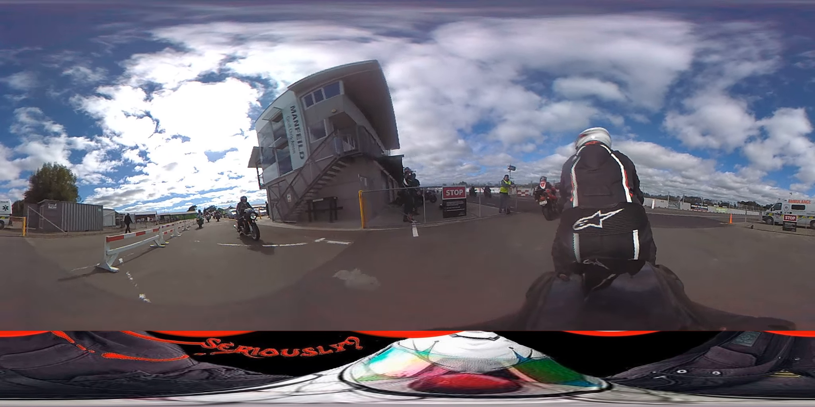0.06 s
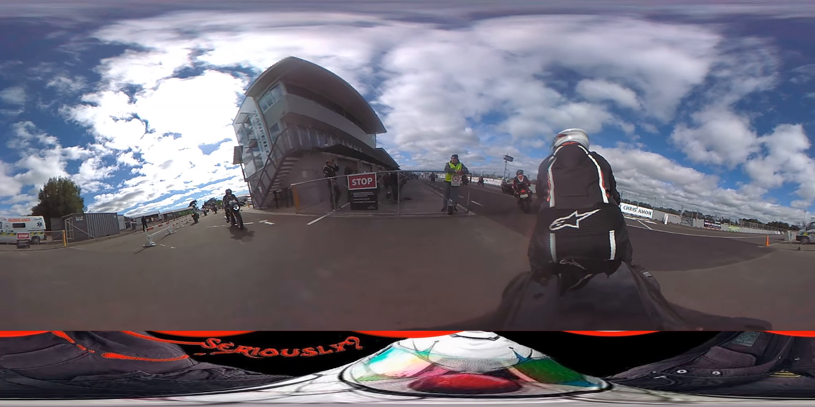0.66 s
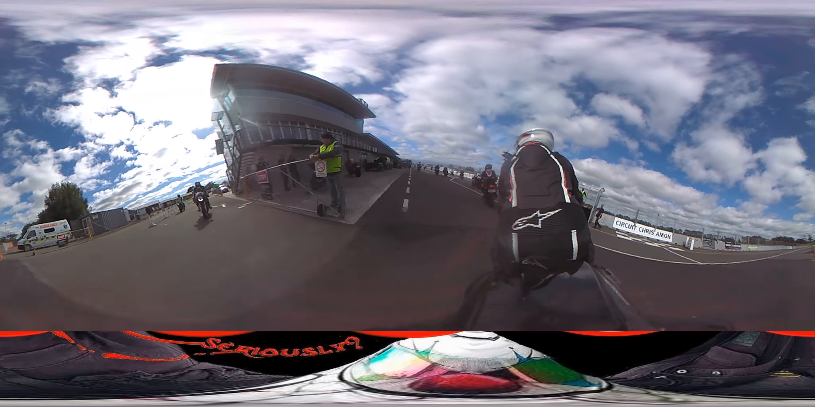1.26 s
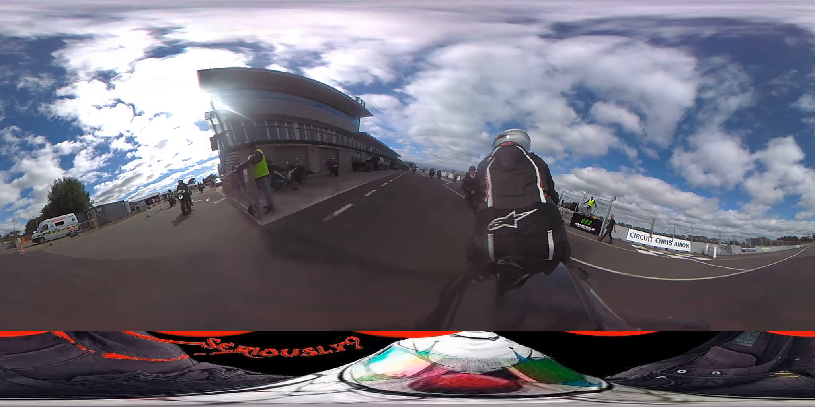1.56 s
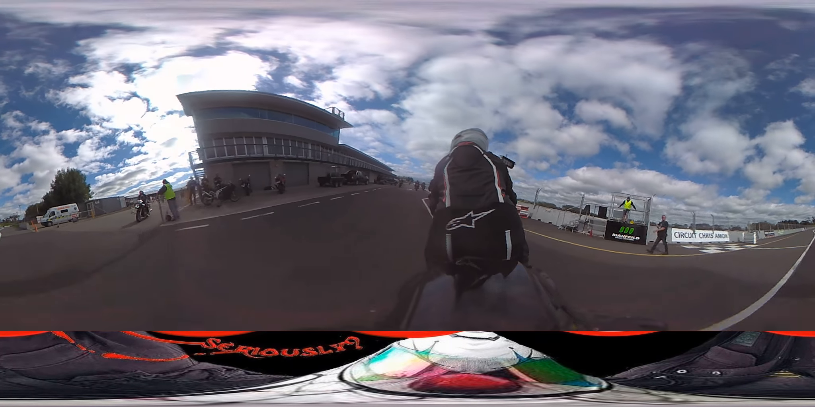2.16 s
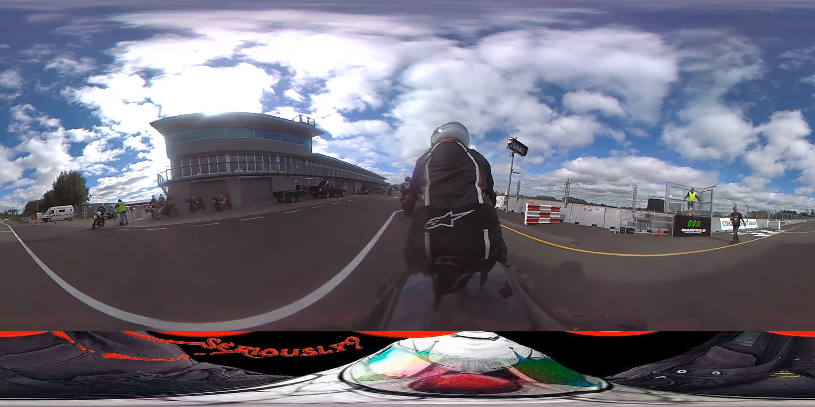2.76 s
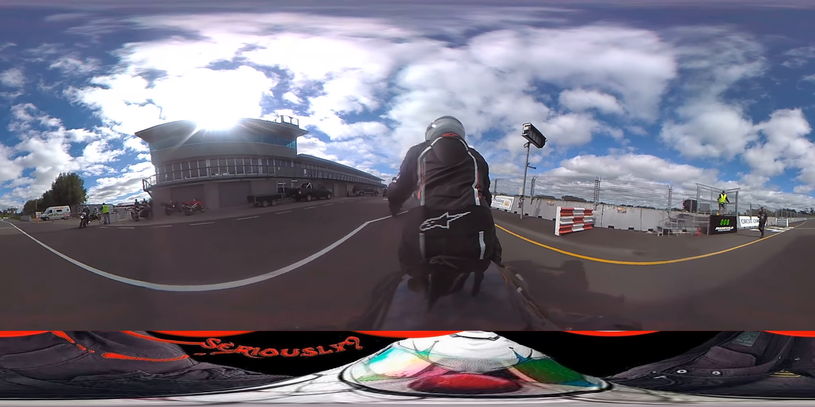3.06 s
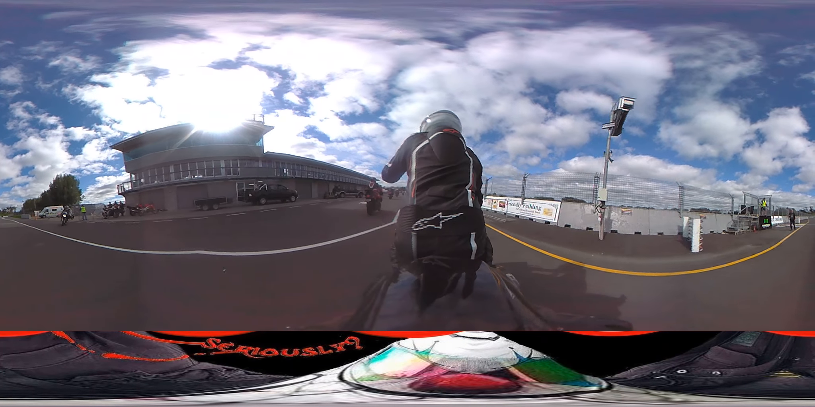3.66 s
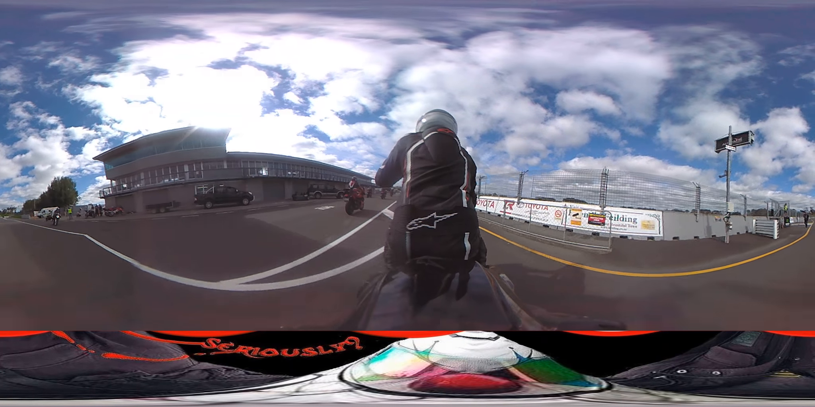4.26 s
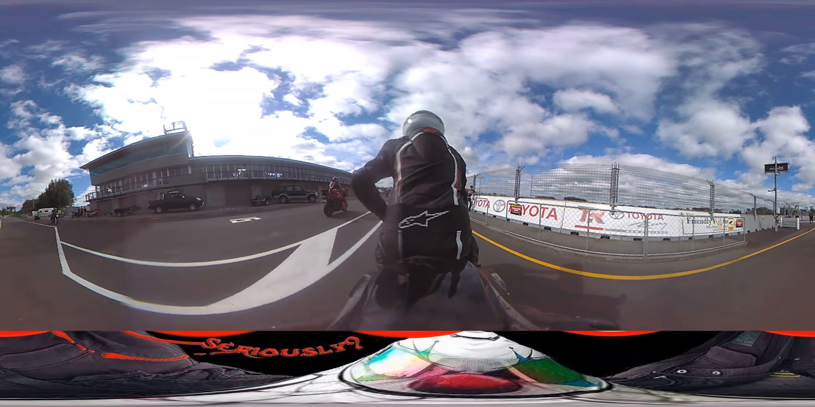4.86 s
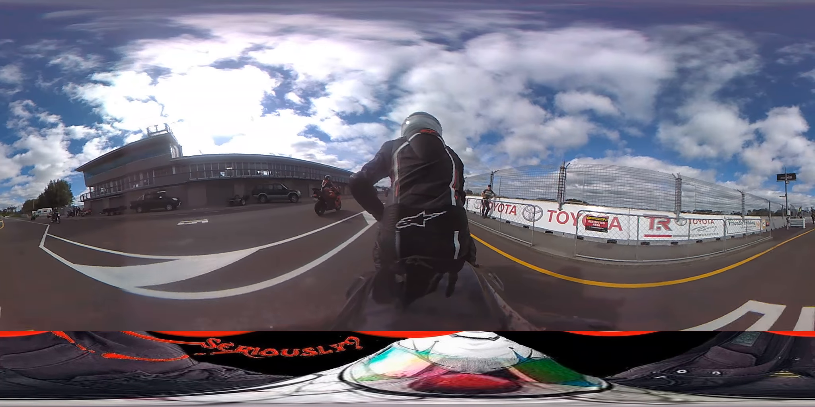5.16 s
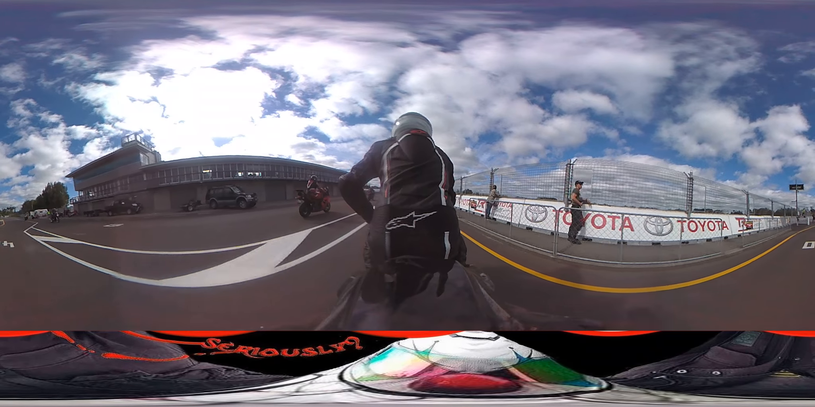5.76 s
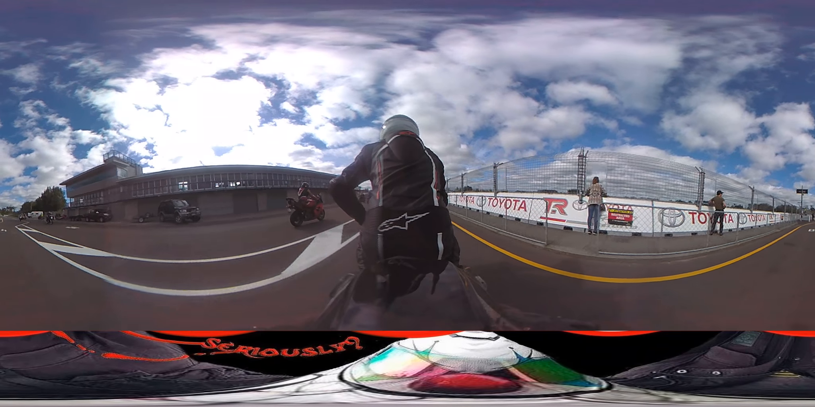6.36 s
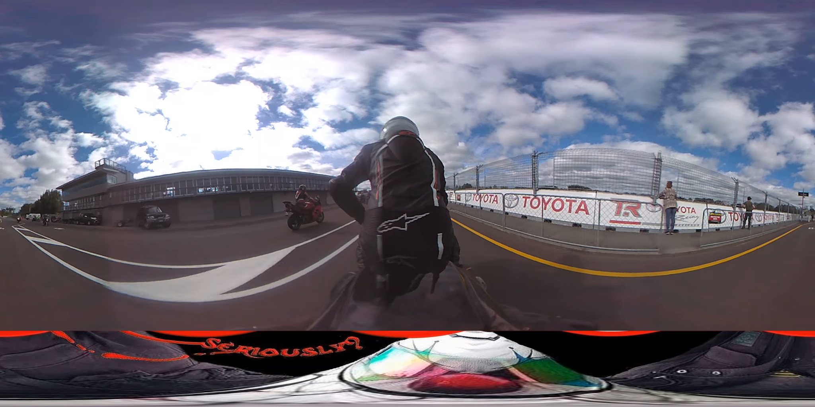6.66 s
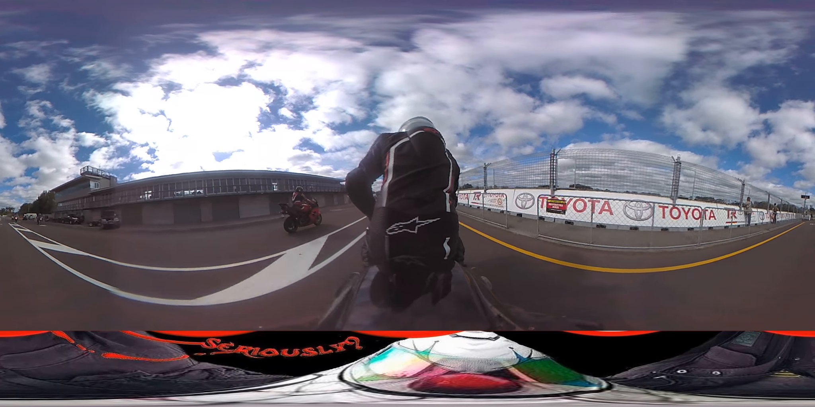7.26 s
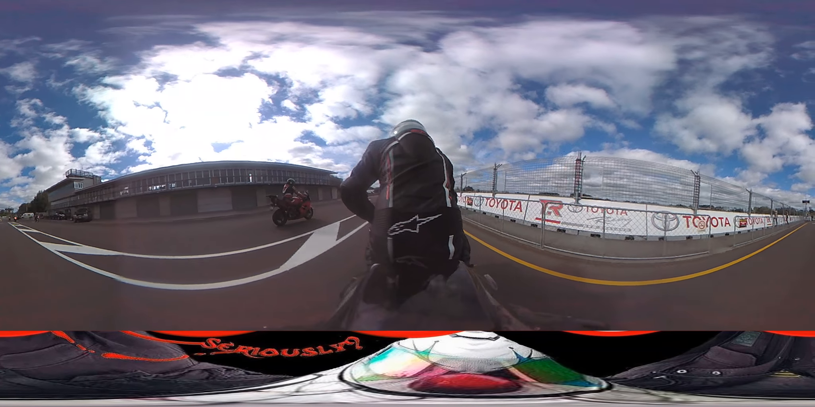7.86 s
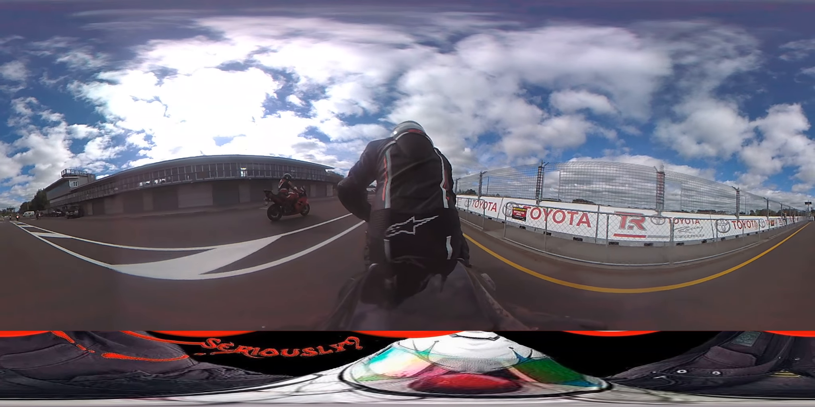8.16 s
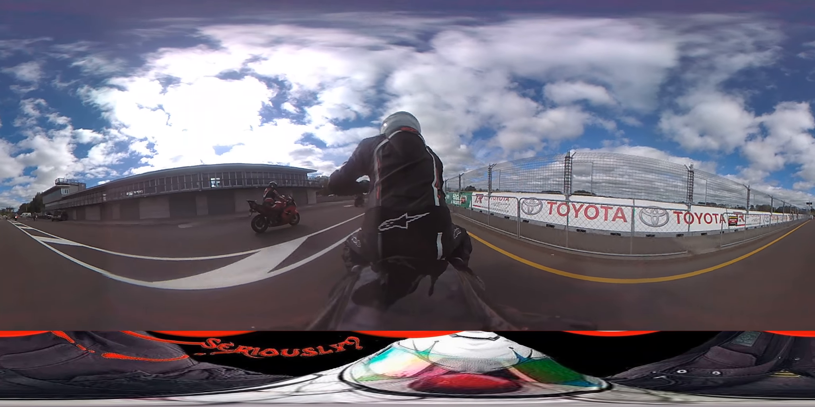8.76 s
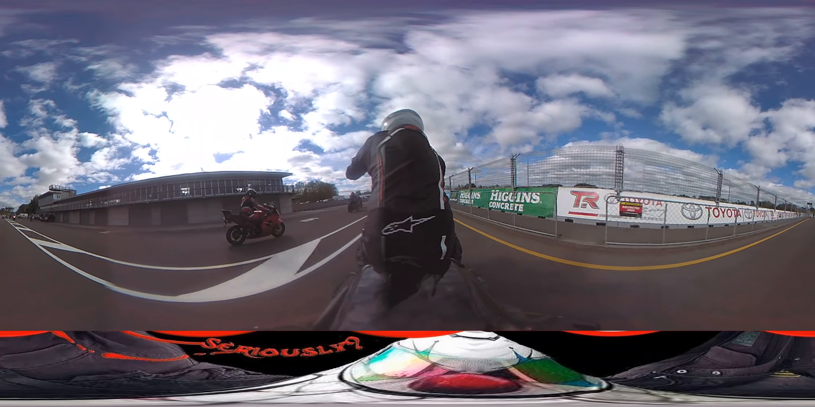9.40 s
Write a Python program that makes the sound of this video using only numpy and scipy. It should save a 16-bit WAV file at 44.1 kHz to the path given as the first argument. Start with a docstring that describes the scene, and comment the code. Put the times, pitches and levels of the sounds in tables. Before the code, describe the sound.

A motorcycle rolls at low revs with a distorted, rasping chatter, pops as the throttle eases, then pulls away in light wind.

```python
"""On a track, a 90-degree V-twin sport motorcycle rolls at low revs, then pulls away, heard from a
camera on its tail. Two unevenly spaced firings a cycle sound the exhaust pipe, which pops and gargles
as the throttle eases midway. Exhaust pressure and slipstream overload both microphones, which flip from
rail to rail; the camera's bass cut turns every flip into a sharp spike, so the engine becomes a hard,
rasping chatter. Wind, a thin fizz and overtones singing in the tail sit behind it."""
import sys
import numpy as np
from scipy import signal
from scipy.fft import rfft, irfft, next_fast_len
from scipy.io import wavfile
from scipy.ndimage import map_coordinates

SR = 44100
rng = np.random.default_rng(int(sys.argv[2]) if len(sys.argv) > 2 else 0)


def to_wav(sig):
    """Store sig (one row per channel, or 1-D mono) as 16-bit WAV at the path in sys.argv[1].

    Samples outside -1..1 are clipped; the rate is SR.
    """
    pcm = np.clip(np.atleast_2d(sig), -1, 1) * 32767
    pcm = np.round(pcm).astype(np.int16)
    wavfile.write(sys.argv[1], SR, pcm.T)  # frames by channels


N = 415849
TIME = np.arange(N) / SR
STEP = 10  # low-pitched layers are built on every tenth sample, then upsampled
COARSE_TIME = np.arange(N // STEP + 1) * STEP / SR


def amp(db):
    """Decibels to gain."""
    return 10 ** (np.asarray(db) / 20)


def curves(rows, t):
    """Automation lanes: each column after the time, read at times t."""
    times, *columns = np.transpose(rows)
    return [np.interp(t, times, column) for column in columns]


def wobble(knots_per_s, t):
    """A smooth random curve, roughly one unit either way."""
    return map_coordinates(rng.standard_normal(int(t[-1] * knots_per_s) + 4), [t * knots_per_s])


def filtered(x, response):
    """x through a filter given as complex gain against frequency."""
    size = next_fast_len(N + SR // 4)
    return irfft(rfft(x, size) * response(np.fft.rfftfreq(size, 1 / SR)), size)[..., :N]


def highs(x, above_hz):
    """The part of x above a soft crossover."""
    return filtered(x, lambda hz: hz ** 4 / (hz ** 4 + above_hz ** 4))


def noise(spectrum, spread):
    """Coloured stereo noise of rms 1; spread is the ratio of side to mid."""
    freq_hz, level_db = np.transpose(spectrum)
    eq = lambda hz: amp(np.interp(np.log(hz + 1), np.log(freq_hz), level_db))
    mid, side = filtered(rng.standard_normal((2, N)), eq)
    pair = np.array([mid + spread * side, mid - spread * side])
    return pair / pair.std()


def bell(offset, half_width):
    """A bell curve: 1 at its centre, 1/e at half_width either side."""
    return np.exp(-(offset / half_width) ** 2)


def resonance(hz, centre_hz, width_hz):
    """Gain of a resonance at pitch hz, 1 at its centre."""
    return 1 / (1 + (2 * (hz - centre_hz) / width_hz) ** 2)


def cycles_from(cycles, place):
    """Signed distance, in cycles, from the nearest pass of a place in the engine cycle."""
    return (cycles - place + .5) % 1 - .5


# The revs, in four-stroke cycles of two crankshaft turns each: time_s, cycle_rate_hz
REVS = [(0.0, 15.927), (0.25, 16.095), (0.5, 16.997), (0.7, 17.334), (1.0, 18.421), (1.15, 18.03),
        (1.3, 17.519), (1.55, 16.565), (1.9, 16.723), (2.3, 17.301), (2.55, 17.967), (2.8, 18.628),
        (3.2, 19.54), (3.7, 20.488), (4.2, 20.597), (4.7, 20.69), (5.1, 20.141), (5.28, 19.705),
        (5.5, 20.747), (5.75, 20.185), (6.3, 20.753), (6.65, 21.142), (7.0, 21.732), (7.6, 22.442),
        (8.3, 23.491), (8.65, 23.85), (9.0, 24.15), (9.43, 25.142)]

def crank(t):
    """Cycle rate, and cycles turned since a firing of the first cylinder."""
    rate, = curves(REVS, t)
    return rate, np.cumsum(rate) * t[1] - .873


# Tone of the wind bed: freq_hz, density_db
WIND_SPECTRUM = [(200, -14), (700, -1.5), (1500, 0), (3000, -7), (5500, -13), (7000, -12.5)]
# Its fader: time_s, level_db
WIND_LEVEL = [(0, -40.5), (2.8, -40.5), (4, -36), (5.3, -39), (6.2, -39.5), (7.3, -42.5), (8.3, -44),
              (9.43, -37.5)]

def wind():
    """Air rushes smoothly past the camera, slowly swelling and ebbing."""
    level_db, = curves(WIND_LEVEL, TIME)
    return amp(level_db) * noise(WIND_SPECTRUM, spread=0.39)


# Tone of the fizz on top of the overload: freq_hz, density_db
FIZZ_SPECTRUM = [(100, -25.5), (800, -10.5), (2000, 3.5), (3500, -8), (5500, -5.5), (7000, -12.5)]

def fizz(level_db=-43, throb_db=5, clack_db=5):
    """A thin fizz swells once per crankshaft turn; the engine clacks through it once a cycle."""
    _, cycles = crank(TIME)
    pulse = -throb_db * np.cos(4 * np.pi * (cycles - 0.42))
    clack = clack_db * bell(cycles_from(cycles, place=0.97), half_width=0.36)
    return amp(level_db + pulse + clack) * noise(FIZZ_SPECTRUM, spread=0.089)


# Singing tail resonances (an order is a multiple of the cycle rate): order, centre_hz, width_hz, level_db
TAIL_TONES = [(20, 322, 29, -26), (23, 370, 35, -24), (24, 428, 24, -24), (27, 494, 22, -29.5),
              (21, 433, 18, -30), (29, 597, 25, -30), (31, 572, 25, -31.5), (32, 660, 50, -35.5),
              (33, 750, 50, -31.5), (41, 842, 71, -34), (42, 865, 50, -37), (53, 1300, 110, -36)]
# Their shared fader: time_s, level_db
TAIL_LEVEL = [(0, -1), (.7, -3), (1, -5), (1.2, 0), (1.4, 1.5), (1.7, -1.5), (2.6, -2.5), (3.6, -1.5),
              (4.6, -3.5), (5, -9), (5.5, -7), (5.9, -4), (7, -4), (9.43, -1)]

def tail_overtones(waver_db=1.6, drift_rad=0.31, delay_s=0.00037):
    """Clean engine orders come through the camera mount as the revs sweep them across tail resonances."""
    t = COARSE_TIME
    rate, cycles = crank(t)
    angle = 2 * np.pi * (cycles - delay_s * rate)
    tone = np.zeros(len(t))
    for order, centre_hz, width_hz, level_db in TAIL_TONES:
        order = round(order)
        gain = amp(level_db + waver_db * wobble(5, t)) * resonance(order * rate, centre_hz, width_hz)
        tone += gain * np.sin(order * angle + drift_rad * wobble(8, t))
    fader_db, = curves(TAIL_LEVEL, t)
    return signal.resample_poly(amp(fader_db) * tone, STEP, 1)[:N]


# Tone of the buffeting at the microphone ports: freq_hz, density_db
BUFFET_SPECTRUM = [(10, -9.5), (40, -8.5), (120, -0.5), (300, -5), (600, -10.5), (1500, -33.5),
                   (5000, -29.5)]
# Air and throttle moves; the last lane rides the engine's upper ring: time_s, buffet_db, ring_db
BUFFET_AND_RING = [(0, -15.5, 1.5), (.6, -11.5, 2), (1.2, -12.5, 0), (1.8, -14.5, 2), (2.6, -12, 2),
                   (3.1, -11.5, -2), (3.6, -18, 0.5), (4.5, -15.5, -0.5), (5, -14, -0.5), (5.2, -10, -10),
                   (5.5, -12, -5.5), (5.75, -16, -1), (6.4, -18, 0), (7.2, -20.5, 0.5), (8, -20.5, 0.5),
                   (8.7, -17, -2.5), (9.43, -18.5, 10.5)]

def slipstream(gust_db=2):
    """Turbulent exhaust and slipstream buffet the two ports, almost alike."""
    buffet_db, _ = curves(BUFFET_AND_RING, TIME)
    return amp(buffet_db + gust_db * wobble(12, TIME)) * noise(BUFFET_SPECTRUM, spread=0.44)


# Tone of the off-throttle gargle: freq_hz, density_db
BURBLE_SPECTRUM = [(25, -13), (90, 2), (170, 0), (280, -5), (500, -6.5), (900, -25), (2000, -61)]
# Its fader: time_s, level_db
BURBLE_LEVEL = [(4.3, -37), (4.82, -11), (5.1, -10), (5.3, -7.5), (5.6, -8), (5.8, -19.5), (6.5, -42.5)]

def burble(lumps_db=3):
    """Off the throttle, ragged burning fills the gaps between the pops with a low gargle."""
    level_db, = curves(BURBLE_LEVEL, TIME)
    return amp(level_db + lumps_db * wobble(40, TIME)) * noise(BURBLE_SPECTRUM, spread=0.094)


# Exhaust pops as the throttle eases: peak_s, level_db, pitch_hz, half_length_s
EXHAUST_POPS = [(4.789, -3.5, 340, 0.0057), (4.832, -3.5, 350, 0.0033), (4.885, 3.5, 338, .006),
                (4.933, -0.5, 328, .005), (4.977, 0.5, 343, 0.004), (5.03, 0, 340, .006),
                (5.084, 4, 341, 0.0054), (5.125, 0, 268, .005), (5.153, -10, 430, 0.012),
                (5.192, 2, 334, 0.0044), (5.282, -0.5, 220, .011), (5.34, -5, 332, .004),
                (5.38, 5, 220, 0.014), (5.431, 3, 342, .004), (5.482, 0, 334, 0.0065),
                (5.579, 3, 364, .004)]

def pops():
    """Unburnt fuel goes off in the pipe, each time ringing for a few swings."""
    pressure = np.zeros(N)
    since = np.arange(-SR // 20, SR // 20) / SR
    for peak_s, level_db, pitch_hz, half_length_s in EXHAUST_POPS:
        pop = amp(level_db) * bell(since, half_length_s) * np.sin(2 * np.pi * pitch_hz * since)
        start = round((peak_s + since[0]) * SR)
        pressure[start:start + len(pop)] += pop
    return pressure


# The ringing bark, strongest at low revs: time_s, level_db, place_cycles, pitch_hz
BARK_MOVES = [(0, -7, 0.455, 348), (.6, -3.5, .465, 344), (1, -5, .47, 399), (1.25, -0.5, .465, 388),
              (1.6, -6, .465, 337), (2.2, -6, .47, 342), (2.7, -4.5, .48, 399), (3.3, -11, 0.495, 390),
              (4, -17.5, 0.5, 387)]

def bark(half_length_s=0.0088, uneven_db=2, rise_hz_per_s=7000):
    """One sharp blast a cycle rings briefly, rising in pitch, each time a little louder or softer."""
    rate, cycles = crank(TIME)
    level_db, place, pitch_hz = curves(BARK_MOVES, TIME)
    since = cycles_from(cycles, place) / rate  # seconds from the middle of the blast
    chirp = np.sin(2 * np.pi * since * (pitch_hz + rise_hz_per_s * since / 2))
    return amp(level_db + uneven_db * wobble(18, TIME)) * bell(since, half_length_s) * chirp


# Exhaust puffs in every cycle, each strongest in its own rev range:
# place_cycles, pitch_hz, half_length_s, level_db, best_rate_hz, rate_half_width_hz
EXHAUST_BLASTS = [(0.191, 378, 0.0024, 2, 18.08, 0.85), (0.19, 395, 0.0014, 6.5, 24.25, 1.3),
                  (0.243, 304, 0.0011, 1.1, 20.8866, 1.06), (0.3806, 135.9, 0.016, -10, 18.21, 2.72),
                  (0.416, 330, 0.0057, 4, 19.5124, 1.52), (0.433, 419, 0.003, -5, 21.92, 3.13),
                  (0.541, 384.6, 0.0047, -4.5, 19.51, 2.95), (0.564, 330, 0.0047, -1.5, 20.62, 3.37),
                  (0.7379, 105.1, 0.00671, 11, 18.6007, 2.315), (0.814, 384, 0.0032, 1, 17.4, 1.1),
                  (0.8414, 367.5, 0.005, 0.76, 19.7737, 2.736),
                  (0.8696, 298.6, 0.0018, 9.5, 20.4798, 2.4871), (0.9879, 108, 0.0156, 3.5, 18.777, 4.07)]

def blasts(uneven_db=1.16):
    """Short puffs locked to the crank give the chug at low revs and the bite higher up."""
    t = COARSE_TIME
    rate, cycles = crank(t)
    pressure = np.zeros(len(t))
    for place, pitch_hz, half_length_s, level_db, best_rate_hz, rate_half_width_hz in EXHAUST_BLASTS:
        since = cycles_from(cycles, place) / rate
        gain = amp(level_db + uneven_db * wobble(20, t)) * bell(rate - best_rate_hz, rate_half_width_hz)
        pressure += gain * bell(since, half_length_s) * np.sin(2 * np.pi * pitch_hz * since)
    return signal.resample_poly(pressure, STEP, 1)[:N]


# Missed firings between the pops: centre_s, half_length_s, dip_db
MISFIRES = [(4.84, .01, -8), (5.154, .024, -16), (5.215, .015, -16.5), (5.248, .016, -9.5),
            (5.297, 0.011, -20), (5.409, 0.0059, -16.5)]

def misfire_gain():
    """The exhaust flow sags wherever a firing is missed."""
    t = TIME[::STEP]
    sag_db = sum(dip_db * bell(t - centre_s, half_s) for centre_s, half_s, dip_db in MISFIRES)
    return np.interp(TIME, t, amp(sag_db))


# Booms that the revs sweep through: order, centre_hz, width_hz, level_db
ORDER_BOOMS = [(3, 67.8, 22.6, 9), (5, 128.7, 47, 15), (8, 175.7, 109, 25), (11, 234, 42, 20),
               (13, 240.4, 74, 31.5), (16, 354.6, 65, 2), (18, 312, 33, 17), (24, 432, 31, 22),
               (28, 490, 50, 13)]

def boom(order, hz):
    """Extra gain for one engine order at pitch hz: it swells inside its resonance, if it has one."""
    return sum(amp(level_db) * resonance(hz, centre_hz, width_hz)
               for boom_order, centre_hz, width_hz, level_db in ORDER_BOOMS if round(boom_order) == order)


# Body of the exhaust and tail: centre_hz, width_hz, first_cylinder_gain, second_cylinder_gain (signed)
PIPE_MODES = [(48.48, 6.93, -0.19, 0.19), (89.74, 31.4, -0.0994, 0.0215), (132.3, 47.56, 0.2302, -0.2215),
              (149.22, 75.9, -0.13, 0.21), (168.8, 41.8, 0.16, -0.21), (206.3, 3.35, -0.0095, 0.0584),
              (293.2, 63.6, 0.02, -0.02), (336.6, 46, 0.0526, -0.0274), (400, 59.7, 0.00075, 0.0237)]

def pipe(hz):
    """The exhaust's resonances add up to one complex response for each cylinder."""
    centre, width, first, second = np.transpose(PIPE_MODES)
    f = hz[:, None]
    modes = 1j * f * width / (centre ** 2 - f ** 2 + 1j * f * width)
    return modes @ first, modes @ second


def engine(uneven=0.1, jitter_cycles=0.0011, stumble_cycles=.018, stumble_s=5.26, ring_hz=260):
    """Two unevenly spaced firings a cycle sound the pipe; a few orders boom above the rest."""
    t = COARSE_TIME
    rate, cycles = crank(t)
    # The crank never turns quite evenly, and off the throttle the firings stray further.
    stray = jitter_cycles + stumble_cycles * bell(t - stumble_s, half_width=.36)
    cycles = cycles + stray * wobble(30, t)
    _, ring_db = curves(BUFFET_AND_RING, t)
    grid_hz = np.arange(SR // 20)
    first, second = pipe(grid_hz)
    firing_gap = 270 / 720  # the second cylinder fires 270 crank degrees after the first
    pressure = np.zeros(len(t))
    for order in range(1, 32):
        hz = order * rate
        lag = np.exp(-2j * np.pi * order * firing_gap)
        both_cylinders = np.interp(hz, grid_hz, first) + np.interp(hz, grid_hz, second) * lag
        ring_share = np.clip(hz / ring_hz - .5, 0, 1)
        gain = (1 + boom(order, hz)) * amp(ring_db * ring_share)
        pressure += (gain * both_cylinders * np.exp(2j * np.pi * order * cycles)).real
    pressure *= 1 + uneven * wobble(20, t)  # no two burns are alike
    return signal.resample_poly(pressure, STEP, 1)[:N]


# EQ moves on the rasp as the load changes: time_s, hum_db, growl_db, treble_db
RASP_EQ = [(0, -0.5, 0, 0), (1.1, 0.5, 0.5, -4), (1.9, 2, -.5, -0.5), (2.6, 0.5, 0, -3),
           (3.15, -2.5, 1, -2), (3.7, 0, 0, -0.5), (4.6, 0, 1, -0.5), (4.9, -1, 1, -2), (5.25, -1, 0, -2.5),
           (5.6, -1.5, 0, -3), (6, -0.5, 0, -0.5), (7.3, -2, -.5, 2), (8.3, -1, -1, 2), (9.43, -1, 1, 0.5)]

def rasp_colour(spikes, hum_hz=315, growl_hz=625, treble_hz=2040, dip_share=0.12):
    """Hum, growl and treble come and go with the load; the level dips briefly at each missed firing."""
    def band(centre_hz, octaves):
        return filtered(spikes, lambda hz: bell(np.log2((hz + 1) / centre_hz), octaves))

    bands = band(hum_hz, octaves=0.21), band(growl_hz, octaves=0.55), highs(spikes, treble_hz)
    eq_change = sum(part * (amp(db) - 1) for part, db in zip(bands, curves(RASP_EQ, TIME)))
    return misfire_gain() ** dip_share * (spikes + eq_change)


# Depth of the engine's throb: time_s, per_turn_db, per_cycle_db
THROB_DEPTH = [(0, 0, 0), (.6, .5, 0.5), (2, .5, .5), (2.7, 1.5, 0), (4.2, 2.2, 1.2), (5.2, 1, 0.3),
               (6, 1.6, 0.4), (7.2, 2, 0), (8.2, 0, -1), (9.43, -2.2, 0.5)]

def throb(spikes, swell_place=0.41, chug_place=0.42):
    """The rasp above the bass swells once per crankshaft turn and chugs once a cycle."""
    _, cycles = crank(TIME)
    per_turn_db, per_cycle_db = curves(THROB_DEPTH, TIME)
    swell_db = per_turn_db * np.cos(4 * np.pi * (cycles - swell_place))
    chug_db = per_cycle_db * np.cos(2 * np.pi * (cycles - chug_place))
    return spikes + highs(spikes, above_hz=280) * (amp(swell_db + chug_db) - 1)


def scene(right_lead_s=.00009):
    """Pressure at the two microphone ports; the right one is slightly nearer the exhaust."""
    flow = engine() + blasts() + bark() + burble() + slipstream()
    pressure = misfire_gain() * flow + pops()
    lead_s = right_lead_s * np.array([[-.5], [.5]])
    return filtered(pressure, lambda hz: np.exp(2j * np.pi * hz * lead_s))


def record(dry, drive_db=26, rail_db=-9.0, cut_hz=106, cut_q=0.59, dull_hz=2600, top_hz=7450):
    """The microphones saturate, a bass cut sags each flat top to a spike, and the quiet layers join."""
    bias = -0.022 + 0.046 * np.array([[1], [-1]])  # each microphone clips off centre in its own way
    railed = np.tanh(amp(drive_db) * (dry + bias))
    bass_cut = lambda hz: -hz ** 2 / (cut_hz ** 2 - hz ** 2 + 1j * hz * cut_hz / cut_q)
    spikes = amp(rail_db) * filtered(railed, lambda hz: bass_cut(hz) / (1 + 1j * hz / dull_hz))
    mix = throb(rasp_colour(spikes)) + tail_overtones() + fizz() + wind()
    return filtered(mix, lambda hz: np.clip((top_hz - hz) / 600, 0, 1))  # the top end stops steeply


dry = scene()
out = record(dry)
to_wav(out)
```